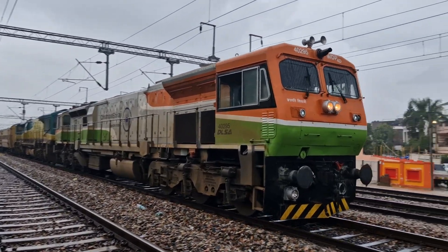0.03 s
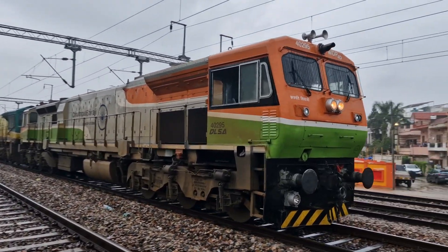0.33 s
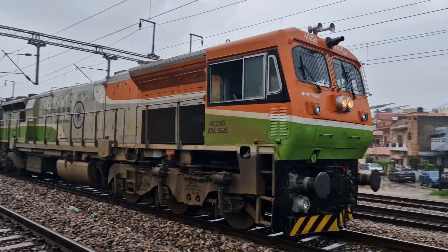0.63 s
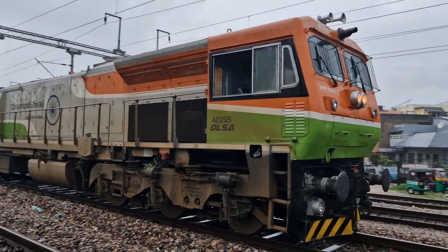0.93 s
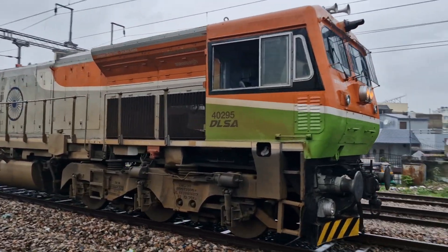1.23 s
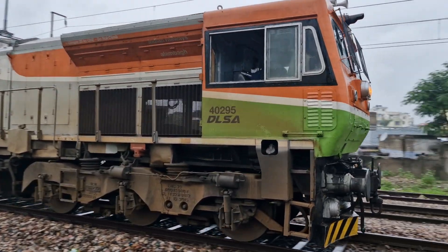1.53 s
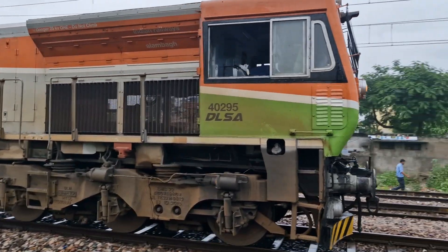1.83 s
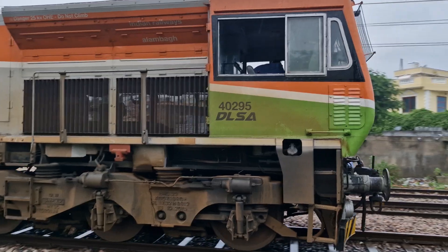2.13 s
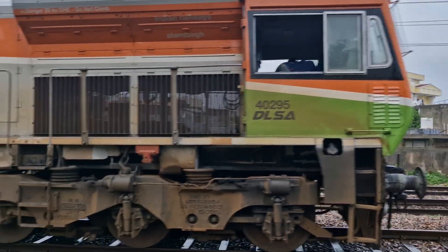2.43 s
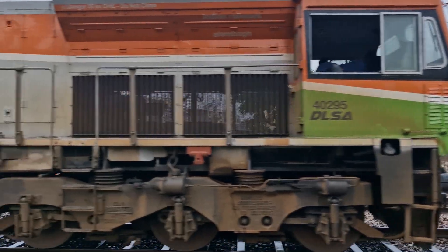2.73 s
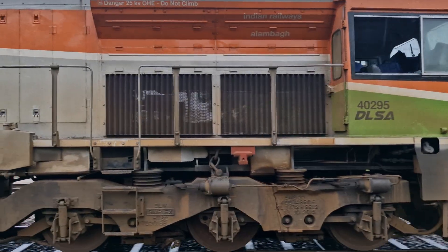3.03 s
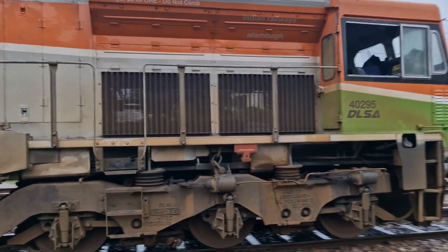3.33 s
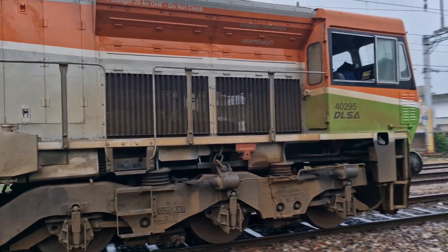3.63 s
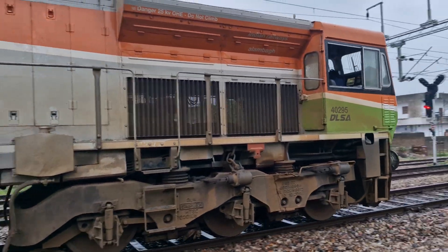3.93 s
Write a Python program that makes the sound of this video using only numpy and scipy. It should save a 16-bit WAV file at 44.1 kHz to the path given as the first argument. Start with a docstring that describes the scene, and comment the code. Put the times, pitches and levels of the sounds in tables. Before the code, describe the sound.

A diesel locomotive rolls past close by, its deep exhaust throbbing quickly under a machinery roar and a thin, high whine. At about 1.5 seconds a loud two-note air horn sounds, ending near 1.9 seconds and echoing off buildings. The engine drops in level with the blast, then comes back around 3 seconds, throbbing harder with a stronger whine until 4 seconds.

```python
"""Passing diesel locomotive with horn.

A diesel rolls past close by, its exhaust throbbing once per crankshaft turn over machinery
roar, gear tones and a high turbocharger whine. One short blast on two air horns echoes off
nearby buildings; a limiter ducks everything, holds, then recovers."""
import sys
import numpy as np
from scipy import signal
from scipy.fft import rfft, irfft
from scipy.io import wavfile
from scipy.ndimage import uniform_filter1d, minimum_filter1d

SR = 44100
rng = np.random.default_rng(int(sys.argv[2]) if len(sys.argv) > 2 else 0)


def master(y):
    """Save y as 16-bit WAV."""
    cut = np.clip(np.atleast_2d(y).T, -1, 1)
    pcm = np.round(cut * 32767)  # scale
    wavfile.write(sys.argv[1], SR, pcm.astype(np.int16))


N = 176400
T = np.arange(N) / SR
HZ = np.fft.rfftfreq(N, 1 / SR)
SHAFT_HZ = 8.075
SHAFT_PHASE = 2 * np.pi * SHAFT_HZ * T
LEFT_LEAD_S, BAND_LIMIT_HZ = 0.0004605, 15800
# Likeness of the two ears: freq_hz, coherence
EAR_COHERENCE = [(60, 0.8), (150, 1), (300, 1), (650, 0.26), (1400, 0.45), (4000, 0.07), (15000, 0)]


def amp(db):
    """Decibels to gain."""
    return 10 ** (np.asarray(db) / 20)


def curve(rows, column=1):
    """Table column over time."""
    rows = np.array(rows)
    return np.interp(T, rows[:, 0], rows[:, column])


def spectrum(rows, hz, column=1):
    """Table column over log frequency."""
    rows = np.array(rows)
    return np.interp(np.log(hz + 1), np.log(rows[:, 0] + 1), rows[:, column])


def drift(rate_hz):
    """Smooth random motion, unit rms, rolling off at rate_hz."""
    x = irfft(rfft(rng.standard_normal(N)) * np.exp(-(HZ / rate_hz) ** 2 / 2), N)
    return x / x.std()


def right_ear(left, independent, hz):
    """Right-ear signal, partly coherent with the left."""
    coherence = np.clip(spectrum(EAR_COHERENCE, hz), 0, 1)
    return coherence * left + np.sqrt(1 - coherence ** 2) * independent


def stereo_noise(rows, column=1):
    """Noise with the given spectrum, reaching the left ear first."""
    # Ear balance: freq_hz, left_minus_right_db
    balance = [(60, 1), (150, -0.5), (600, 1.5), (1200, -4), (2200, -5), (3300, -7.5), (4300, -3),
               (5500, -4), (6500, 5.5), (7900, 13.5), (9500, 6.5), (11500, 0), (14000, -3)]
    left, independent = rfft(rng.standard_normal((2, N)))
    right = right_ear(left, independent, HZ) * np.exp(-2j * np.pi * HZ * LEFT_LEAD_S)
    tilt = amp(spectrum(balance, HZ) / 2)
    ears = np.array([left * tilt, right / tilt])
    return irfft(ears * amp(spectrum(rows, HZ, column)), N) * np.sqrt(SR / 2)


def machinery_roar(approach_until_s=0.88, alongside_s=3.01, flutter_db=0.63, swell_db=0.25):
    """Fans, gears and wheels: broad noise that fills out as the body comes alongside."""
    # Roar spectra: freq_hz, approaching_db, alongside_db
    bands = [(20, -72, -70), (34.6, -58.5, -61), (60, -67, -32), (130, -49, -48), (222, -58.5, -52),
             (345, -65, -51), (540, -64.5, -59.5), (810, -61.5, -60), (1166, -69, -61), (1230, -61.5, -61),
             (1870, -65, -64), (2060, -73, -63.5), (2330, -65, -64.5), (2950, -71.5, -70),
             (3670, -70, -65.5), (4870, -72, -70.5), (6200, -81, -72.5), (6960, -77.5, -76.5),
             (9340, -96, -89.5), (10750, -96.5, -87.5), (12900, -87.5, -85), (14400, -78, -73),
             (15100, -100, -91)]
    # Roar envelope: time_s, gain_db
    envelope = [(0, -3.5), (.45, 0.5), (.9, 3), (1.45, -3), (2, 3), (2.6, 0.5), (3.1, 2), (3.5, 0.5),
                (4, 2)]
    near = np.clip((T - approach_until_s) / (alongside_s - approach_until_s), 0, 1)
    wash = stereo_noise(bands) * np.sqrt(1 - near) + stereo_noise(bands, column=2) * np.sqrt(near)
    return wash * amp(curve(envelope) + flutter_db * drift(60) + swell_db * drift(3.6))


def engine_tones(pass_s=0.5):
    """Wavering gear and blower tones, and a whine line an octave below the whistle, each loudest as its opening
    faces the listener."""
    # Gear and blower tones, plus 3567 Hz at half the whistle's pitch: pitch_hz
    pitches = [307, 322, 636, 704, 907, 1270, 3567, 3918, 4578]
    # Shape of each tone: width_hz, base_db, peak_db, peak_s
    shapes = [(3.02, -45, -31.5, 0.78), (3, -37.5, -29, 3.57), (20, -42, -34, .15), (20.2, -45, -33, 0.64),
              (20.1, -40, -33, 3), (25, -50.5, -40, 3.5), (12, -54.5, -36.5, 0.9), (24.8, -46.5, -40, 3.8),
              (16, -55, -39.5, 3.96)]
    out = np.zeros((2, N))
    for hz, (width_hz, base_db, peak_db, peak_s) in zip(pitches, shapes):
        facing = np.exp(-((T - peak_s) / pass_s) ** 2)
        gain = amp(base_db + (peak_db - base_db) * facing)
        phase = 2 * np.pi * hz * T
        left, independent = [drift(width_hz / 2) * np.cos(phase) + drift(width_hz / 2) * np.sin(phase)
                             for _ in range(2)]
        out += gain * np.array([left, right_ear(left, independent, hz)])
    return out


def turbo_whine(pitch_hz=7125, spread_hz=120, flicker_db=1.9, swell_db=2.2):
    """The turbocharger's unsteady whistle and its octave."""
    # Whistle envelope: time_s, left_db, right_db
    envelope = [(0, -39.5, -44), (.35, -32.5, -44), (.65, -36.5, -41), (.95, -32.5, -38.5),
                (1.45, -37, -32.5), (2, -36, -33), (2.45, -30, -33), (2.8, -28.5, -43), (3.15, -35.5, -33),
                (3.4, -25.5, -33), (3.6, -33, -37), (4, -28.5, -36)]
    ears = []
    for column, octave_db in [(1, -20.5), (2, -11.5)]:
        phase = 2 * np.pi * np.cumsum(pitch_hz + spread_hz * drift(600)) / SR
        octave = amp(octave_db + flicker_db * drift(200)) * np.sin(2 * phase)
        level_db = curve(envelope, column) + flicker_db * drift(130) + swell_db * drift(9.5)
        ears.append((np.sin(phase) + octave) * amp(level_db))
    return np.array(ears)


def exhaust_puffs(firings_per_turn=8, firing_db=3, throb_db=2.6, uneven_db=1.1):
    """Gas noise bursts with each uneven firing, strongest once a turn."""
    # Gas noise spectrum: freq_hz, level_db
    bands = [(150, -78), (300, -46.5), (480, -65.5), (700, -45), (900, -56.5), (1100, -76), (3000, -90)]
    # Puff envelope: time_s, gain_db
    envelope = [(0, -6.5), (.7, -2.5), (1.45, -6), (2.6, -4.5), (4, -3.5)]
    firing = np.cos(firings_per_turn * SHAFT_PHASE - 2 * np.pi * 0.6)
    throb = np.cos(SHAFT_PHASE - 2 * np.pi * 0.48)
    pulses = amp(firing_db * firing + throb_db * throb + uneven_db * drift(35))
    pulses /= np.sqrt(np.mean(pulses ** 2))
    return stereo_noise(bands) * pulses * amp(curve(envelope))


def exhaust_booms(wander_db=0.43, bend_rad_per_neper=0.45, left_db=-0.6):
    """Strong shaft harmonics swell and bend once a turn, over a bed of weaker ones."""
    # Strong harmonics: shaft_order, throb_share, peak_turns
    booms = [(8, 0.78, 0.53), (13, 0.44, 0.29), (17, 0.68, 0.41), (19, 0.61, 0.4)]
    # Their envelopes: time_s, boom1_db, boom2_db, boom3_db, boom4_db
    envelopes = [(0, -21, -22.5, -44, -62), (.8, -13.5, -15, -29, -62), (1.4, -12.5, -26, -26.5, -50),
                 (2.1, -13, -16, -26.5, -51), (2.5, -14.5, -20.5, -26, -44), (2.75, -19.5, -23.5, -38, -33),
                 (3.05, -11, -19, -33, -33.5), (3.45, -13, -18.5, -26, -28.5), (4, -11, -28, -56, -34)]
    # Throb at full share: time_s, depth_db
    throb = [(0, 4.4), (1.2, 4), (2.3, 2.2), (2.8, 6.5), (3.3, 7), (4, 6.2)]
    # Weak harmonics: freq_hz, level_db
    bed = [(32, -65), (42, -42.5), (64, -43), (88, -29), (98, -50.5), (120, -30), (145, -40.5), (180, -48),
           (250, -47.5), (310, -41), (360, -49.5), (460, -50.5), (560, -70)]
    out = np.zeros(N)
    for column, (order, share, peak_turns) in enumerate(booms, start=1):
        depth_db = share * curve(throb)
        throb_phase = SHAFT_PHASE - 2 * np.pi * peak_turns
        level_db = curve(envelopes, column) + depth_db * np.cos(throb_phase) + wander_db * drift(5.5)
        bend_rad = bend_rad_per_neper * np.log(amp(depth_db)) * np.sin(throb_phase)
        out += amp(level_db) * np.cos(order * SHAFT_PHASE + bend_rad)
    for order in range(4, 70):
        gain = amp(spectrum(bed, order * SHAFT_HZ)) * (1 + 0.4 * drift(1.1))
        out += gain * np.cos(order * SHAFT_PHASE + 2 * np.pi * rng.random())
    delayed = np.interp(T - LEFT_LEAD_S, T, out)
    return np.sqrt(2) * np.array([out * amp(left_db), delayed / amp(left_db)])


def air_horn(pitch_hz, blast, timbre, settle_s=0.03, release_bend=0.01, waver=0.0013, rasp=0.006):
    """A diaphragm settles on pitch and brightens as pressure builds, dulls as it dies; air hisses."""
    start_s, close_s, offset_hz, rise_s, decay_s = blast
    on = (T > start_s) & (T < close_s + 1)
    age_s = T[on] - start_s
    build = 1 - np.exp(-age_s / rise_s)
    release = np.exp(-(np.maximum(T[on] - close_s, 0) / decay_s) ** 1.42)
    hz = pitch_hz + offset_hz * np.exp(-age_s / settle_s)
    hz *= 1 + release_bend * (1 - release) + waver * drift(25)[on] + rasp * drift(270)[on]
    phase = 2 * np.pi * np.cumsum(hz) / SR
    hiss = signal.lfilter([0.3], [1, -0.7], rng.standard_normal((2, len(age_s))))
    sound = amp(-31) * build ** 4 * np.sqrt(release) * hiss
    for k in range(1, int(BAND_LIMIT_HZ / pitch_hz)):
        ear_gains = amp([[spectrum(timbre, k * pitch_hz, column)] for column in (1, 2)])
        envelope = (build * release) ** (1 + np.log(k) ** 2 / 2)  # upper harmonics rise late, die early
        sound += ear_gains * envelope * np.cos(k * phase - np.sqrt(k) * np.pi)
    out = np.zeros((2, N))
    out[:, on] = np.sqrt(2) * sound
    return out


def with_yard_echo(x, taps_per_s=1500, build_s=0.1, near_decay_s=0.02, near_highpass_hz=3400):
    """Close reflections off cab and ballast scatter the treble; buildings return a long echo."""
    # Building echo: freq_hz, t60_s, level_db
    bands = [(250, 1.5, -16.5), (460, 1.9, -11), (796, 2.9, -10), (1460, 1.5, -13), (3000, 0.92, -5),
             (8000, 0.7, 1), (15000, .4, -5)]
    t = T[:SR]
    taps = rng.standard_normal((2, SR)) * (rng.random((2, SR)) < taps_per_s / SR)
    hz, frame_s, frames = signal.stft(taps, SR, nperseg=256)
    t60_s = spectrum(bands, hz)[:, None]
    level_db = spectrum(bands, hz, column=2)[:, None] - 60 * frame_s / t60_s
    frames *= amp(level_db) * np.sqrt(2 * np.log(1000) / t60_s)
    tail = signal.istft(frames, SR, nperseg=256)[1][:, :SR] / np.linalg.norm(taps[0])
    tail *= np.minimum(t / build_s, 1)
    near = rng.standard_normal((2, SR)) * np.exp(-t / near_decay_s)
    highpass = signal.butter(2, near_highpass_hz, "high", fs=SR, output="sos")
    near = amp(-1) * signal.sosfilt(highpass, near / np.linalg.norm(near[0]))
    return x + signal.fftconvolve(x, tail + near, axes=1)[:, :N]


def scene():
    """The engine with its two horns on the cab roof."""
    # Horn blasts, low then high: start_s, valve_close_s, start_offset_hz, rise_s, decay_s
    blasts = [(1.511, 1.775, 25, 0.032, 0.11), (1.574, 1.753, -16, 0.044, 0.093)]
    # Low horn spectrum: freq_hz, left_db, right_db
    low_timbre = [(251, 4, 3), (533, -15, -24.5), (786, -7, -5.5), (1030, -10.5, -56), (1270, -9.5, -16),
                  (1460, -18.5, -33), (1860, -20.5, -25), (2000, -28, -58), (2358, -29, -40),
                  (2710, -48, -32), (2928, -20, -13), (3100, -29, -27), (3400, -31.5, -40),
                  (3660, -30, -40), (3880, -35.5, -33.5), (4580, -29, -43), (5420, -39, -35),
                  (6600, -49, -35), (8140, -38.5, -67), (9500, -58, -63), (12500, -52, -43),
                  (15400, -70, -47)]
    # High horn spectrum: freq_hz, left_db, right_db
    high_timbre = [(407, -2, 1.5), (830, -6, -5), (1263, -9.5, -11.5), (1630, -46, -20), (2500, -52, -40),
                   (4060, -62, -17), (6940, -62, -56), (10000, -43, -61), (13000, -56, -50),
                   (15500, -56, -60)]
    low_horn = air_horn(pitch_hz=261.5, blast=blasts[0], timbre=low_timbre)
    high_horn = air_horn(pitch_hz=417.3, blast=blasts[1], timbre=high_timbre)
    engine = exhaust_booms() + exhaust_puffs() + machinery_roar() + turbo_whine() + engine_tones()
    return engine + with_yard_echo(low_horn + high_horn)


def record(dry, ceiling_db=0.5, hold_s=1.271, recover_db_per_s=38.5):
    """A peak limiter ducks at once, holds, then recovers; a low-pass follows."""
    over_db = np.maximum(20 * np.log10(abs(dry).max(0) + 1e-9) - ceiling_db, 0)
    half_hold = int(hold_s * SR / 2)
    held_db = -minimum_filter1d(-over_db, 2 * half_hold + 1, origin=half_hold, mode="constant")
    ramp_db = T * recover_db_per_s
    duck_db = uniform_filter1d(np.maximum.accumulate(held_db + ramp_db) - ramp_db, size=200)
    lowpass = signal.firwin(511, BAND_LIMIT_HZ, window=("kaiser", 9), fs=SR)
    return signal.oaconvolve(dry / amp(duck_db), lowpass[None], "same")


dry = scene()
out = record(dry)
master(out)
```